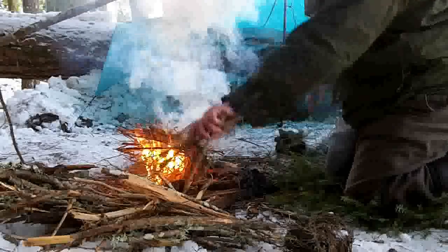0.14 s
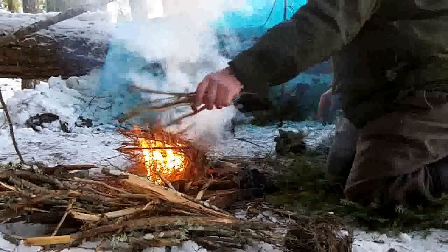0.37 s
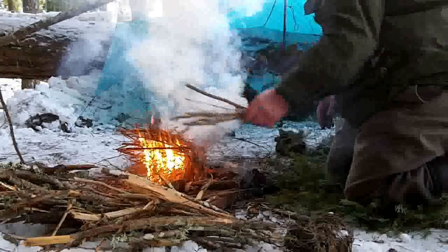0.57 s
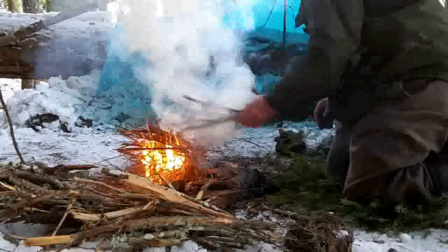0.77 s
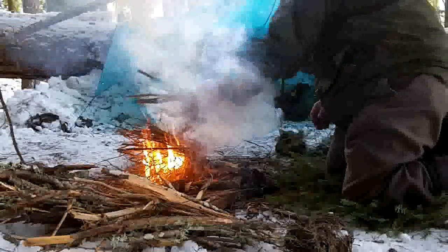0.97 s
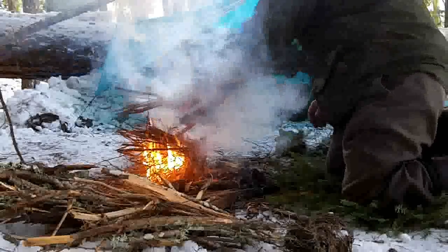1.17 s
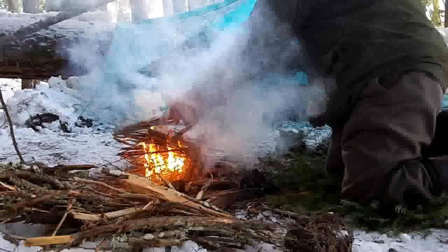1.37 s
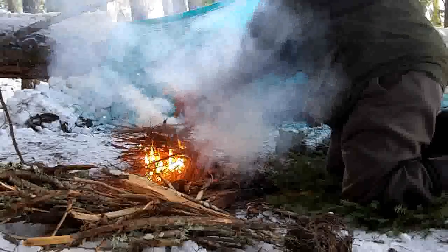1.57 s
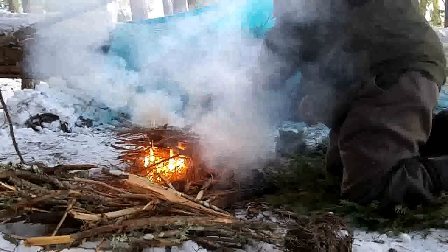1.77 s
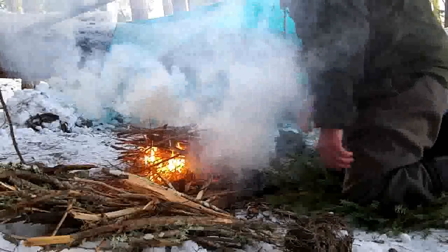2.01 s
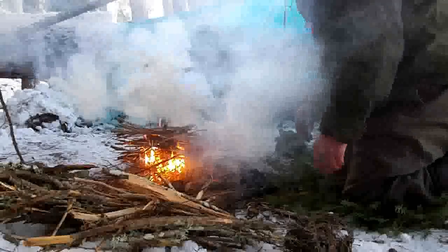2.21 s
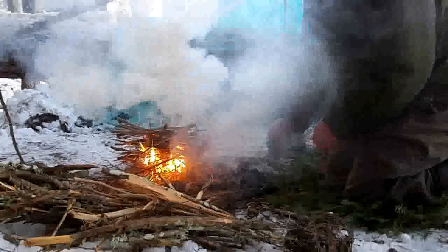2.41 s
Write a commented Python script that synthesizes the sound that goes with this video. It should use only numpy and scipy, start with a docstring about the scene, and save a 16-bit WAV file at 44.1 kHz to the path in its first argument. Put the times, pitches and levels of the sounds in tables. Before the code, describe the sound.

Close crackling of a little wood fire, with light scraping of handled sticks.

```python
"""A small twig fire in the snow, close to the microphone: sap pockets burst in pops and faint ticks.
At the fireside, dry sticks are gathered and laid on: they scrape, rub and tap, ringing in their woody
resonances, and a sleeve rustles with the handling. Behind it all lies the soft hiss of the flames.
The single microphone adds a thin, steady hiss of its own on top."""
import sys
import numpy as np
from scipy import signal
from scipy.fft import rfft, irfft, next_fast_len
from scipy.io import wavfile
from scipy.ndimage import uniform_filter1d, map_coordinates

SR = 44100
rng = np.random.default_rng(int(sys.argv[2]) if len(sys.argv) > 2 else 0)


def wrap_up_sound(samples):
    """Save the sound to the file named by the first command line argument, as 16-bit audio."""
    columns = np.atleast_2d(samples).T
    # keep every value between -1 and 1, then stretch to whole-number steps
    tamed = np.clip(columns, -1, 1)
    steps = np.round(tamed * 32767).astype(np.int16)
    wavfile.write(sys.argv[1], SR, steps)


N = 108045

# Clear pops, close up: (time [s], peak [dB], treble tilt [dB], ring pitch [Hz], relative ring level [dB])
POPS = [(0.0115, -37, 23, 2990.0, -16), (0.023, -33, 12, 4870, -9), (0.0274, -34.5, 5, 2330.0, -6),
        (0.0416, -39, -2.4, 3810.0, 0), (0.0689, -30, 14, 2430, -1.5), (0.1202, -29, 4, 2240.0, -2.5),
        (0.1722, -27.5, 4, 2990.0, -19), (0.2176, -17.5, 3, 3750.0, -27), (0.253, -29.5, -8, 3250.0, 2.5),
        (0.2645, -29.5, 3, 1500, -15), (0.273, -30, -5, 2300.0, -16), (0.2808, -31.5, -10, 4600, -3),
        (0.303, -31.5, 5, 4520.0, -15), (0.3309, -23.5, -3, 2080, -16.6), (0.3361, -37, -8, 3010.0, -6.4),
        (0.3456, -36.8, 5, 3270.0, -5.5), (0.3555, -30.5, 0, 3380.0, -9.8), (0.358, -33, 0, 2000.0, -9),
        (0.429, -44, -14, 1510.0, -4), (0.4536, -19.5, -2.5, 3230, -28), (0.473, -41, 2, 3230, -2),
        (0.5094, -33.5, -23, 3000, 3), (0.548, -27.3, 0, 3320, -21), (0.573, -36, 12, 3060.0, -5),
        (0.5794, -33, -25, 2530, -9), (0.6027, -32.5, -11, 3400, -16), (0.6964, -6, -0.5, 3800, -32),
        (0.7148, -35, -11.0, 2450.0, -5), (0.7244, -28.5, -12, 3170, 3.5),
        (0.7641, -34.5, -0.1, 2280.0, -10.4), (0.8194, -35, 5, 3420.0, -18),
        (0.8712, -34.5, 7, 4110.0, -18.2), (0.9205, -37.5, 0, 5170, -1.5), (0.9568, -30.7, -6, 2600, -25),
        (0.982, -38.7, 7, 2300.0, -14), (1.0214, -29.5, -3.5, 3320, -2.5), (1.0744, -29.5, -6, 2240.0, -24),
        (1.096, -38, 4.1, 2070.0, -10), (1.1333, -27.5, 1, 2410.0, -14), (1.1372, -30.5, -0.7, 2730.0, -19),
        (1.145, -35.1, 1, 4480.0, -18), (1.156, -37, 3, 4000, -4.5), (1.1644, -34.5, -1.5, 3530, -6.7),
        (1.1826, -35.3, -1, 3490.0, -13), (1.1961, -27.5, 6, 2280, -5.5), (1.2163, -42, -0.9, 4890.0, -8.7),
        (1.2392, -40, 1.8, 2330.0, -9.6), (1.2567, -33.5, -2, 2330, -5), (1.2836, -30, -3, 3250.0, -18.1),
        (1.3376, -22, -9.5, 2240, -20), (1.436, -35, -15, 2540, -21), (1.4414, -20.5, -9.5, 1770, -14),
        (1.5315, -26.5, -1, 2480.0, -23), (1.5537, -28, 3, 2120, -8), (1.5914, -39, -1.4, 2000.0, -8),
        (1.6124, -18.5, 5.5, 4910.0, -33), (1.6228, -14, -3.2, 2690.0, -42), (1.6321, -31, -5, 3840, -9.1),
        (1.6561, -18, -4.5, 2350, -20), (1.6636, -37, 3, 2180, 3.5), (1.7158, -33, -6, 2370, -8),
        (1.7283, -35, 4, 1510.0, -13), (1.7339, -24.5, -14, 3600.0, -6), (1.7406, -11.5, 7, 3500, -42),
        (1.753, -31.5, 7, 2490, -6), (1.7566, -34, -1, 4030.0, -4.3), (1.765, -33, 0.3, 4220.0, -13),
        (1.8059, -27, -2.5, 3770, -9), (1.8348, -37, 0, 1810.0, -4.5), (1.8531, -37, -3, 5160, 0),
        (1.8599, -32, -9, 3080.0, -16), (1.8753, -25, 0.5, 4870.0, -6), (1.912, -34.5, 6, 2540, -9),
        (1.9324, -37, 11, 2820.0, -8), (1.9688, -17, 0.5, 1830, -21), (1.9853, -28, 12, 4030.0, -26),
        (1.996, -34, -11, 3940.0, -10), (2.0232, -39.6, 8, 3120.0, -5), (2.044, -41, 2, 3500, -7.3),
        (2.047, -34, -6, 2410.0, -9), (2.116, -38, -1, 3400.0, -12), (2.1286, -35.5, 3, 2350.0, -3),
        (2.161, -11.5, 6.0, 3520, -28), (2.2377, -36.9, -4.4, 2430.0, -8), (2.261, -33, 0, 3420, -7),
        (2.2778, -28, -23, 2510, -24), (2.3069, -29, -12, 2880, -23), (2.3426, -33.1, 8, 4900, -8),
        (2.3599, -39.5, -0.7, 2540.0, -7), (2.3759, -31, 3, 3790.0, -20), (2.4168, -37, -22, 1980.0, -15),
        (2.4222, -28, -6, 4000, -9.7), (2.4333, -41, -0.1, 2650.0, -3), (2.4441, -36, -7, 1590.0, -9.3)]
def crackle(ticks_per_s=110, tick_floor_db=-54.5, tick_spread_db=10):
    """Sap pockets burst in the burning twigs: clear pops among many faint ticks at random."""
    gap, strength, tilt, pitch = rng.random((400, 4)).T
    times = np.cumsum(-np.log(gap + 1e-9)) / ticks_per_s
    peak_db = tick_floor_db + np.minimum(-tick_spread_db * np.log(strength + 1e-9), 10)
    ticks = sap_bursts(times, peak_db, bright_db=14 * (tilt - .5), ring_hz=1800 + 3000 * pitch,
                       ring_db=np.full(len(times), -9.))
    return sap_bursts(*np.transpose(POPS)) + ticks


# Spectrum of one crack at the microphone: (frequency [Hz], level [dB])
CRACK_SPECTRUM = [(100, -19), (600, -18), (1200, -11.5), (1700, -12), (2600, -2.5), (3400, -1.5),
                  (4000, -5.5), (4800, -3), (5600, -6), (6900, -14.5), (7400, -25), (7900, -41.5),
                  (8900, -27), (10300, -43)]
def sap_bursts(times, peak_db, bright_db, ring_hz, ring_db, ring_t60_s=.007, echo_t60_s=.014):
    """Each burst is a suction-first crack, a brief ring of the twig and echoes off the wood pile."""
    size, body_hz, pivot_hz = 1024, 1080, 3730
    hz, t = np.fft.rfftfreq(size, 1 / SR), np.arange(size) / SR
    # Weaker pops have less body.
    body_db = .48 * np.maximum(peak_db, -30)[:, None] / (1 + (hz / body_hz) ** 4)
    tilt_db = bright_db[:, None] / 2 * np.tanh(2 * np.log2((hz + 1) / pivot_hz))
    crack = -irfft(minimum_phase(along(CRACK_SPECTRUM, hz) + body_db + tilt_db))
    crack /= crack.max(1, keepdims=True)
    onset = 1 - np.exp(-(t / .0004) ** 2)
    ring_gain = amp(ring_db[:, None] + 2 - 60 * t / ring_t60_s) * onset
    ring = ring_gain * np.sin(2 * np.pi * ring_hz[:, None] * t)
    scatter = rng.standard_normal(crack.shape) * onset * amp(-28 - 60 * t / echo_t60_s)
    echoes = irfft(rfft(scatter) * rfft(crack))
    pops = amp(peak_db)[:, None] * (crack + ring + echoes)
    starts = np.round(times * SR).astype(int) - crack.argmax(1)  # each crack peaks at its time
    samples = np.clip(starts[:, None] + np.arange(size), 0, N)
    return np.bincount(samples.ravel(), pops.ravel(), N + 1)[:N]


# Resonances of the dry sticks at the fireside: (frequency [Hz], width [Hz], level [dB])
STICK_MODES = [(1260, 210, -7.5), (1900, 360, 1), (2340, 270, -4.5), (2860, 650, -5), (3450, 1000, -3.5),
               (4850, 1600, -17.5), (5370, 1700, -16.5)]
# Loudness of the handling: (time [s], level [dB])
RUSTLE_LEVEL = [(0, -50), (.06, -62), (.075, -52), (.11, -50), (.13, -48), (.15, -49.5), (.18, -50.5),
                (.2, -44), (.212, -42.5), (.23, -62.5), (.27, -52.5), (.33, -60), (.38, -53.5), (.41, -64),
                (.45, -49.5), (.48, -50.5), (.51, -49), (.55, -56), (.6, -55.5), (.64, -64), (.75, -52.5),
                (.9, -68.5), (1.15, -55), (1.3, -60.5), (1.5, -65), (1.58, -57), (1.7, -62), (1.76, -61),
                (1.81, -61.5), (1.9, -53), (2.0, -54), (2.08, -59.5), (2.13, -52.5), (2.18, -48.5),
                (2.24, -55.5), (2.3, -63), (2.45, -83)]
# Brightness of the handling: (time [s], tilt [dB per octave])
RUSTLE_TILT = [(0, 4), (.15, 6.5), (.3, -1), (.4, -2.5), (.6, -1), (.9, -2.5), (1.5, 3.5), (1.9, 4),
               (2.15, -3.5), (2.45, -4)]
def stick_rustle(scrapes_per_s=1500, pivot_hz=2800, cutoff_hz=6800):
    """Small scrapes and smooth friction ring the sticks; which resonance leads keeps changing."""
    rustle = np.zeros(N)
    for hz, width_hz, db in STICK_MODES:
        catches = rng.random(N) < scrapes_per_s / SR
        scrapes = catches * amp(2 * rng.exponential(size=N)) * rng.standard_normal(N)
        friction = unit(scrapes) + rng.standard_normal(N)
        wander_db = 2.1 * map_coordinates(rng.standard_normal(60), [np.arange(N) * 20 / SR])
        tilt_db = curve(RUSTLE_TILT) * np.log2(hz / pivot_hz)
        rustle += amp(db + tilt_db + wander_db) * resonance(friction, hz, width_hz)
    rustle = filtered(rustle, lambda f: 1 / (1 + (f / cutoff_hz) ** 16))
    return unit(rustle) * amp(curve(RUSTLE_LEVEL))


# Resonances of one dragged stick: (frequency [Hz], width [Hz], level [dB], group [0 low, 1 high])
DRAG_MODES = [(1310, 160, -12.5, 0), (2220, 67, 0.5, 0), (3310, 130, -4.5, 1), (3770, 160, -2.5, 1)]
# Friction along the pull: (time [s], low group level [dB], high group level [dB])
DRAG_FRICTION = [(0.055, -70, -62), (0.069, -53, -49), (0.093, -49, -57), (0.121, -44, -58),
                 (0.149, -51, -59), (0.173, -54, -48), (0.187, -40.5, -51), (0.201, -45.5, -36),
                 (0.221, -46, -55), (0.225, -52, -58)]
def stick_drag(gain_db=-2.5):
    """One stick is pulled out of the pile: friction noise sings in its narrow modes."""
    times, *group_levels = np.transpose(DRAG_FRICTION)
    t, drag = np.arange(N) / SR, np.zeros(N)
    for hz, width_hz, db, group in DRAG_MODES:
        rub_db = np.interp(t, times, group_levels[round(group)], left=-120, right=-120)
        friction = rng.standard_normal(N) ** 3  # cubed for a gritty grain
        ring = resonance(resonance(friction, hz, width_hz), hz, width_hz=900)
        drag += amp(gain_db + db + rub_db) * unit(ring)
    return drag


# Taps in the wood pile: (time [s], level [dB], pitch [Hz], time to fall 60 dB [s])
TAPS = [(0.1274, -37.5, 2800, 0.01), (.3785, -35.5, 1930, 0.0069), (.5028, -42.5, 2130, 0.016),
        (.5110, -44, 1840, 0.016), (.5240, -47, 1880, 0.018), (.6110, -43, 2290, 0.017),
        (1.5293, -34, 2630, 0.011), (1.5288, -38, 4200, 0.0072), (1.5300, -39.5, 5220, 0.0076),
        (1.567, -39, 2580, 0.011), (2.0720, -38, 1900, 0.0083), (2.1760, -47, 2170, 0.031)]
def stick_taps(rise_s=.00048, roughness=.6):
    """Sticks tap each other softly: one woody mode each, roughened by random flutter."""
    taps, t = np.zeros(N + SR), np.arange(SR // 20) / SR
    for start, db, hz, t60 in TAPS:
        window = np.hanning(round(3 * SR / hz))[None]  # three cycles long
        flutter = roughness * unit(signal.fftconvolve(rng.standard_normal((2, len(t))), window, "same"))
        phase = 2 * np.pi * hz * t
        ring = (1 + flutter[0]) * np.sin(phase) + flutter[1] * np.cos(phase)
        envelope = amp(db + 5 - 60 * t / t60) * (1 - np.exp(-t / rise_s))
        taps[round(start * SR):][:len(t)] += envelope * ring
    return taps[:N]


# Spectrum of the flames, close up: (frequency [Hz], relative level [dB])
FLAME_SPECTRUM = [(15, -33), (25, 1), (69, -0.5), (172, -1.5), (214, 0.5), (308, -2.5), (511, -4),
                  (605, -3), (1310, -5), (3440, -6.5), (5440, -11.5), (6760, -15.5), (8000, -35),
                  (10400, -67), (17600, -120)]
# Slow drift of the flames: (time [s], level before gain [dB])
FLAME_LEVEL = [(0.0, -59), (1.69, -62), (2.15, -60), (2.45, -61)]
def flames(gain_db=5):
    """The flames make a soft, broad, nearly even hiss behind the crackle."""
    return amp(curve(FLAME_LEVEL) + gain_db) * patchy_noise(FLAME_SPECTRUM, patchy_db=1.0)


# Spectrum of rubbing cloth: (frequency [Hz], relative level [dB])
CLOTH_SPECTRUM = [(40, -5.5), (200, 1.5), (600, 1.5), (1100, -5), (2000, -26.5)]
# Loudness of the sleeve at the microphone: (time [s], level [dB])
SLEEVE_LEVEL = [(0, -73), (.2, -65), (.4, -69), (.5, -58), (.6, -70), (1.0, -78), (1.18, -60.5), (1.3, -72),
                (1.95, -75), (2.15, -67), (2.45, -69)]
def sleeve():
    """A moving sleeve rubs in faint, dull swells."""
    return amp(curve(SLEEVE_LEVEL)) * patchy_noise(CLOTH_SPECTRUM, patchy_db=3.5)


# Self-noise of the microphone: (frequency [Hz], relative level [dB])
HISS_SPECTRUM = [(7900, -36), (8300, -8.5), (8700, -4), (9500, -2), (10200, 3), (10500, -16.5)]
def microphone_hiss(rms_db=-70):
    """The microphone's own thin, steady hiss, high in the treble."""
    return amp(rms_db) * patchy_noise(HISS_SPECTRUM, patchy_db=2.3)


def amp(db):
    """Decibels to gain."""
    return 10 ** (np.asarray(db) / 20)


def unit(x):
    """x scaled to rms 1."""
    return x / np.sqrt(np.mean(x ** 2) + 1e-20)


def along(points, hz):
    """(frequency, value) points read at hz on a log axis."""
    freqs, values = np.transpose(points)
    return np.interp(np.log(hz + 1), np.log(freqs + 1), values)


def curve(rows):
    """(time, value) rows drawn out to one value per sample."""
    return np.interp(np.arange(N) / SR, *np.transpose(rows))


def filtered(x, response):
    """x through a complex frequency response."""
    size = next_fast_len(N + 8192)
    return irfft(rfft(x, size) * response(np.fft.rfftfreq(size, 1 / SR)), size)[..., :N]


def resonance(x, hz, width_hz):
    """x through one damped mode."""
    return filtered(x, lambda f: 1j * f * width_hz / (hz ** 2 - f * f + 1j * f * width_hz))


def patchy_noise(spectrum, patchy_db):
    """Coloured noise of rms 1, its gain varying in random patches of time and frequency."""
    cells = signal.stft(rng.standard_normal(N + 512), nperseg=512)[2]
    patches = uniform_filter1d(uniform_filter1d(rng.standard_normal(cells.shape), 6, 0), 10, 1)
    noise = signal.istft(cells * amp(patchy_db * unit(patches)), nperseg=512)[1][:N]
    colour = [(0.87, -91)] + list(spectrum) + [(22000, -150)]
    return unit(filtered(noise, lambda hz: amp(along(colour, hz))))


def minimum_phase(db):
    """Causal responses for rows of gains in dB."""
    cepstrum = irfft(db * np.log(10) / 20)
    half = cepstrum.shape[1] // 2
    cepstrum[:, 1:half] *= 2
    cepstrum[:, half + 1:] = 0
    return np.exp(rfft(cepstrum))


def scene():
    """The fireside from close by, in mono: crackle and sticks in front, sleeve and flames behind."""
    background = flames() + sleeve()
    return (crackle() + stick_rustle() + stick_drag() + stick_taps() + background)[None]


def record(dry):
    """The microphone adds its hiss and cuts off steeply at the top of its band."""
    top_hz = 10550
    return filtered(dry + microphone_hiss(), lambda hz: 1 / (1 + (hz / top_hz) ** 90))


dry = scene()
out = record(dry)
wrap_up_sound(out)
```